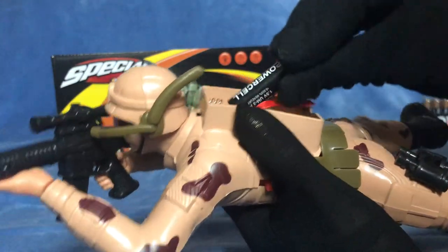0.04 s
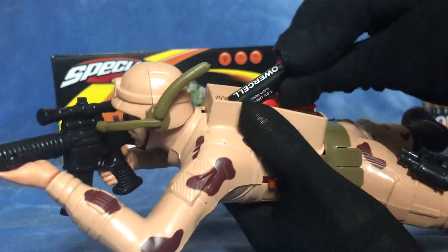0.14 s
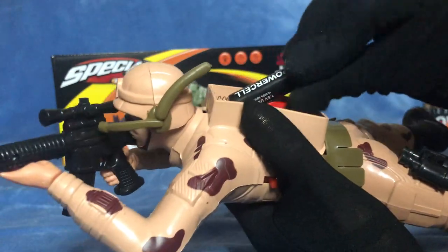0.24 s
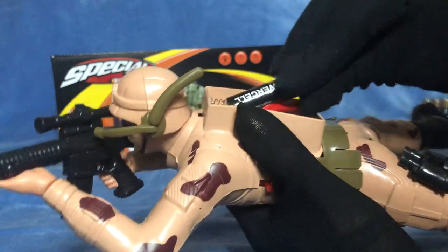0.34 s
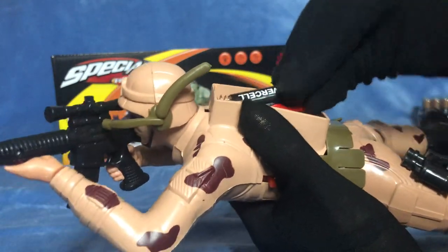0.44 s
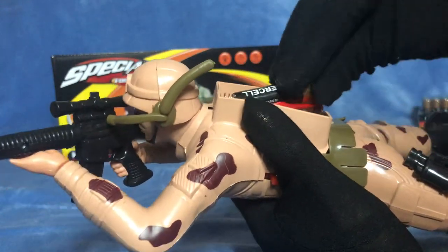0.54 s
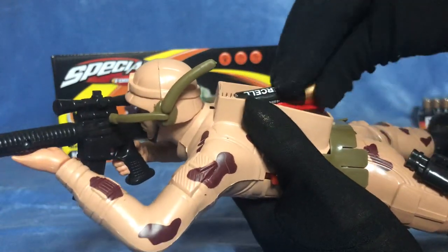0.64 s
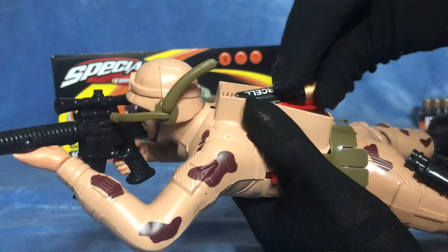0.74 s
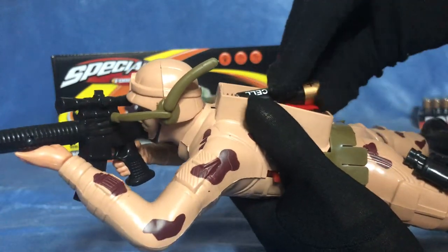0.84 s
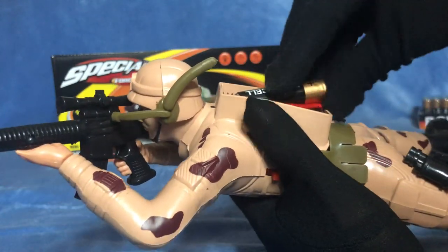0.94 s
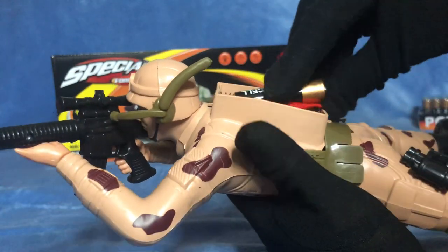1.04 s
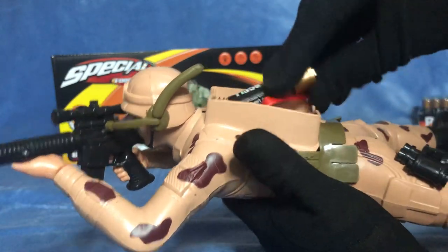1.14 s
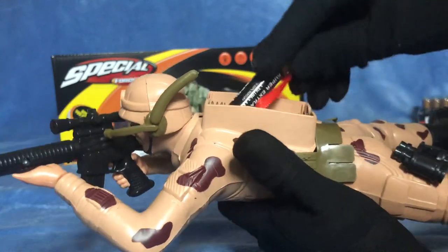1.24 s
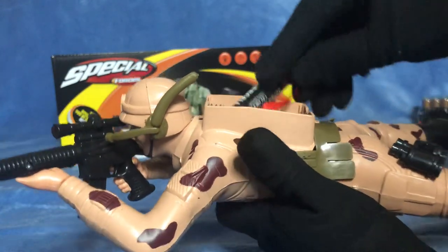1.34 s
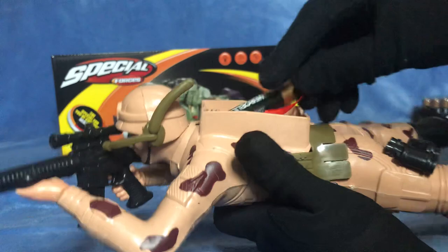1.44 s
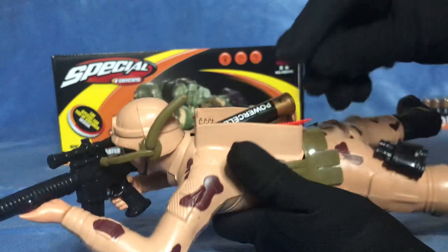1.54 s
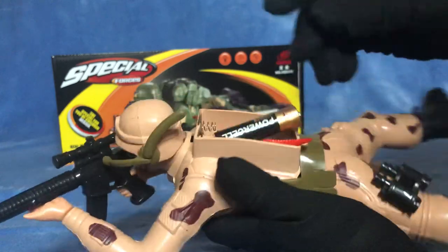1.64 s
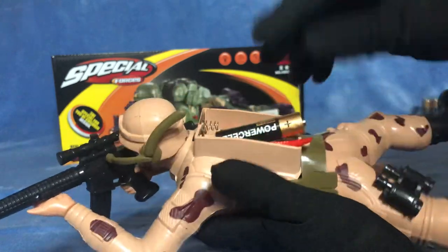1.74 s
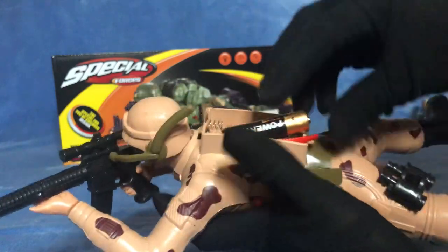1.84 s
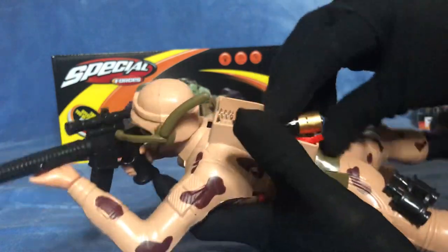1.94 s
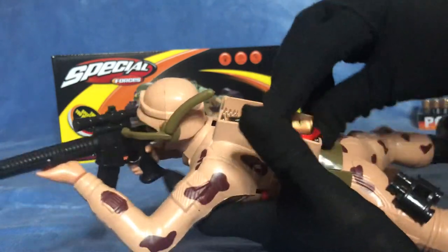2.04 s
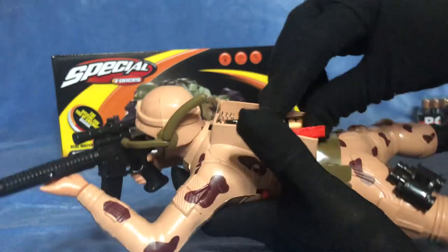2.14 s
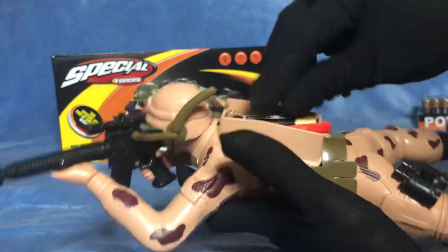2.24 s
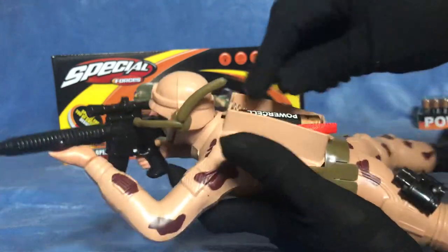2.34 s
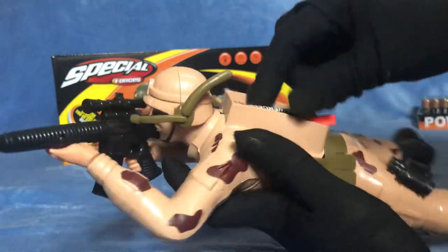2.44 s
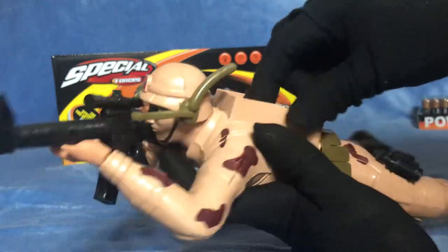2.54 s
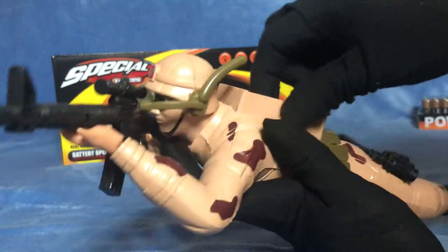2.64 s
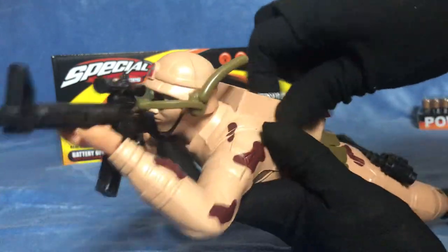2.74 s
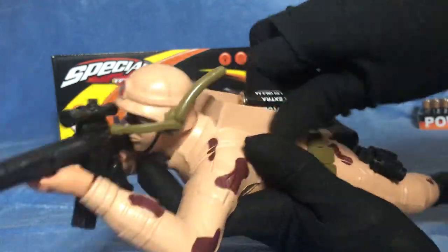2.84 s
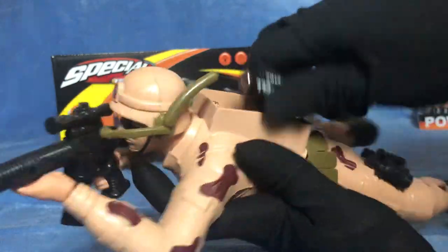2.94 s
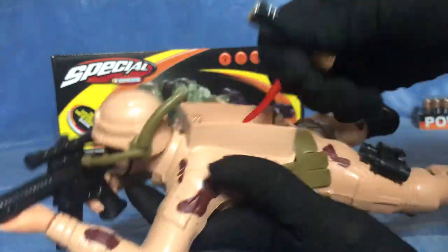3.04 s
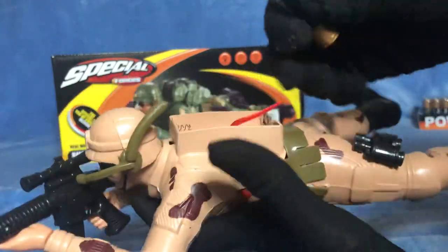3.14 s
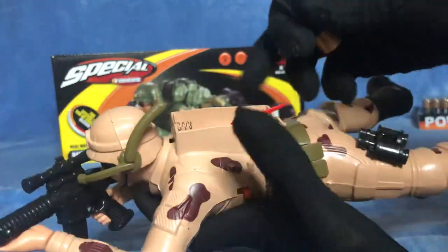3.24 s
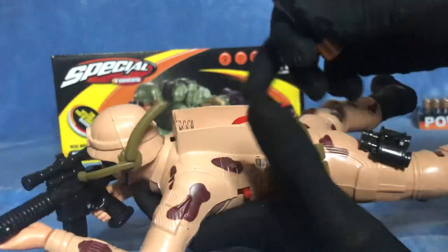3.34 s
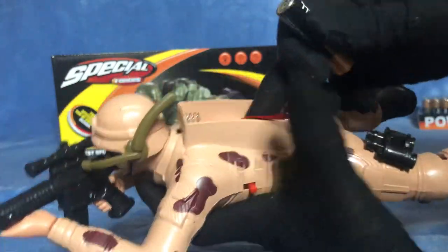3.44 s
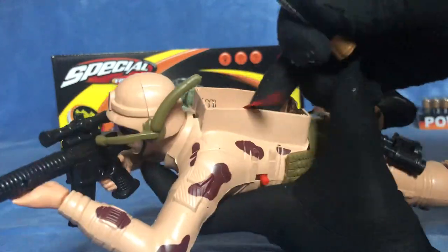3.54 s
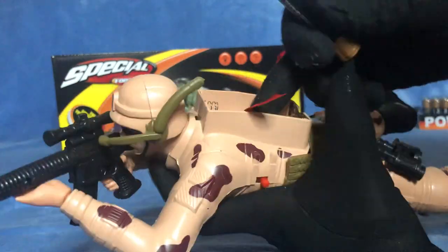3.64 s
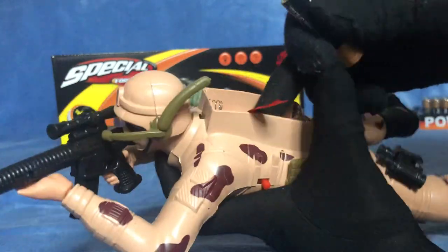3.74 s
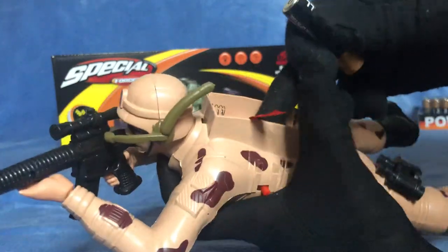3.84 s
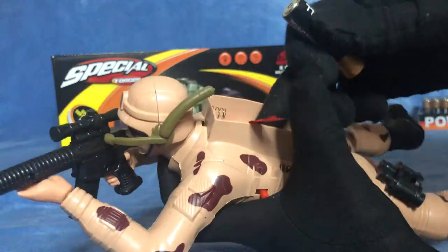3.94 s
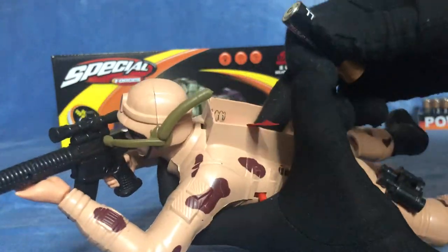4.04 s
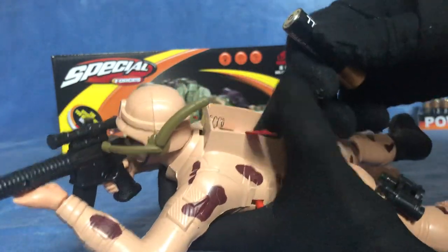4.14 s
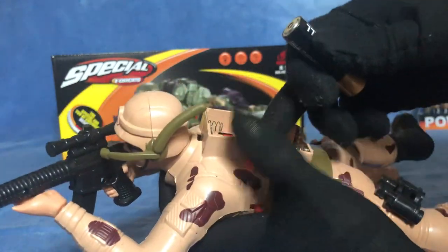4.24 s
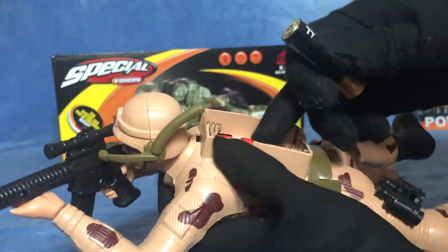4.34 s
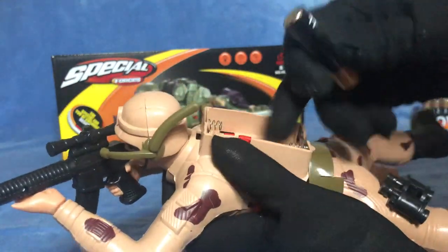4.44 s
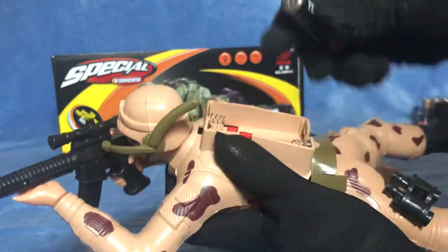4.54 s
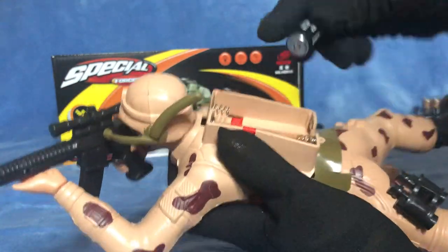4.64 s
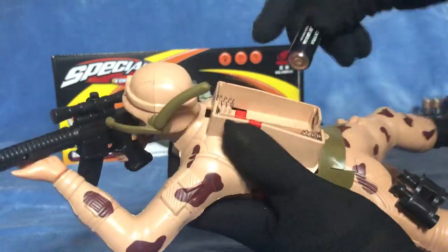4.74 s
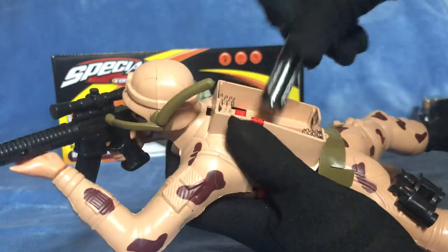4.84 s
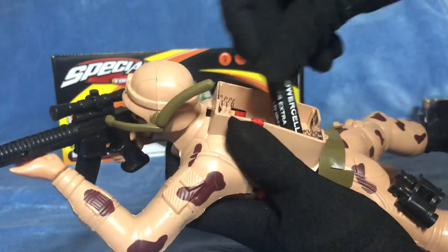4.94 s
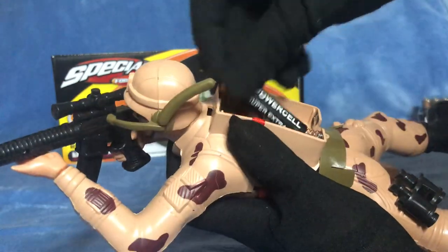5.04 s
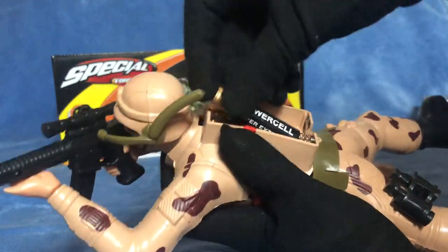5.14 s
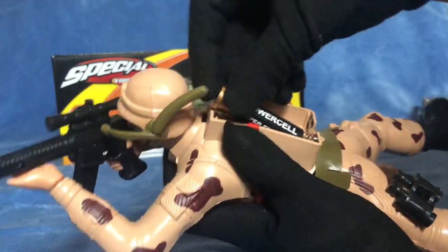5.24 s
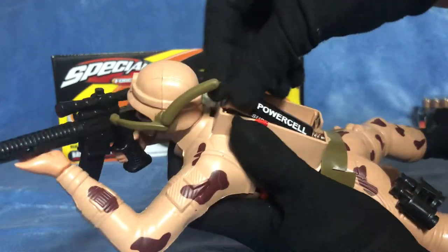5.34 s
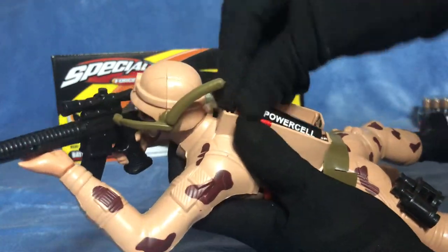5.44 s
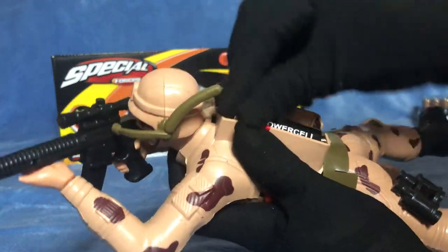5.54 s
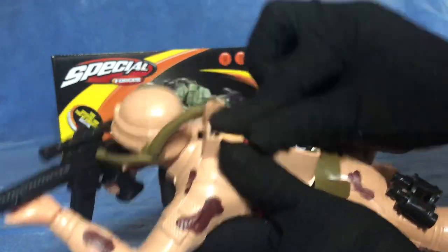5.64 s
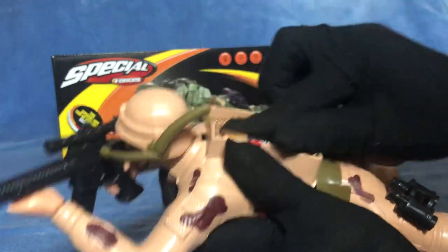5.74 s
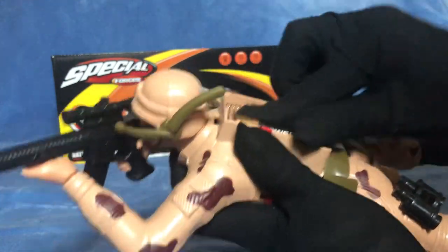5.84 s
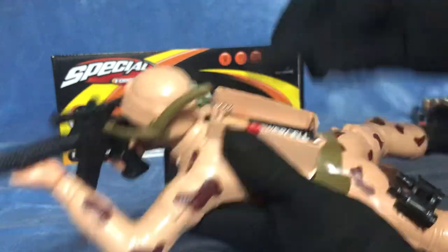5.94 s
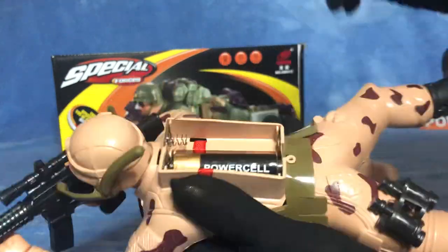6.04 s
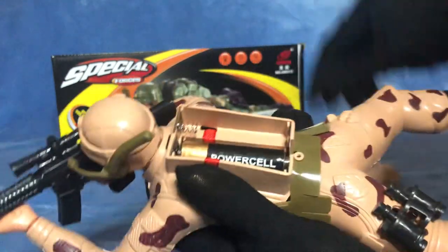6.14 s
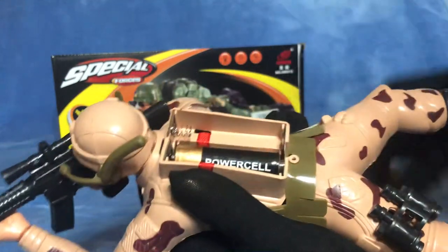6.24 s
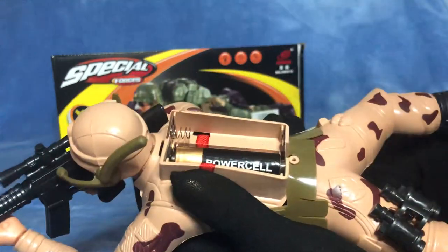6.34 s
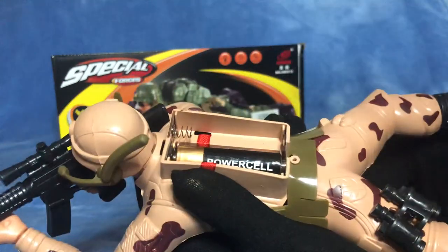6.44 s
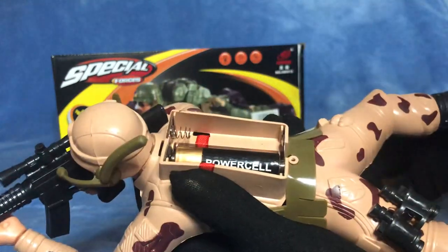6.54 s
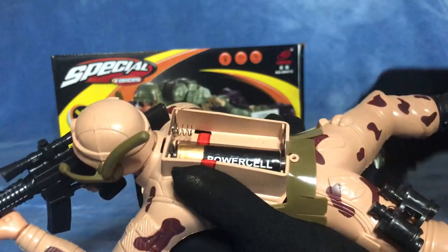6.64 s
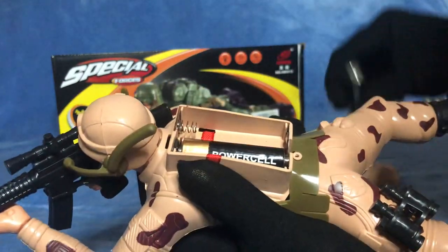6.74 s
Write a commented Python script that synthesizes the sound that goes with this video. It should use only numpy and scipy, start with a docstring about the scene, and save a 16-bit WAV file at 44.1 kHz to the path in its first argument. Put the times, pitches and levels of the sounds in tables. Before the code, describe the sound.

Gloved hands press batteries into a hollow plastic toy, close to the microphone in a small room. Sharp clicks and knocks come unevenly with soft cloth rubbing, and a loose battery drops and rattles a few times. One hard snap makes the toy thump. After a quieter spell, a dull handling rumble and another run of clicks and scrapes follow. A fan hums and ticks faintly throughout.

```python
"""Gloved hands press batteries into a hollow plastic toy, close by in a small room.
From the start a fan hums and ticks faintly, while cloth rubs and batteries click on shell and springs.
Between 1.3 and 2.1 s a loose battery drops and bounces three times. Near 2.7 s the hardest snap
makes the whole toy thump. After a quieter spell, handling rumbles from about 4.5 s and a last run
of clicks and scrapes follows. From 6.1 s the rumble fades, leaving the fan and faint brushing."""
import sys
import numpy as np
from scipy import signal
from scipy.fft import rfft, irfft, next_fast_len
from scipy.io import wavfile
from scipy.ndimage import uniform_filter1d

SR = 44100
rng = np.random.default_rng(int(sys.argv[2]) if len(sys.argv) > 2 else 0)


def materialize(psi):
    """Save the field psi as 16-bit PCM at rate SR to the path in sys.argv[1].

    A 1-D psi becomes a single channel; in a 2-D psi each row is a channel.
    """
    bounded = np.clip(np.atleast_2d(psi).T, -1, 1)
    quanta = np.round(bounded * 32767).astype(np.int16)
    wavfile.write(sys.argv[1], SR, quanta)


N = 300317
TIME = np.arange(N) / SR

# A battery hits the shell: start_s, level_db, pitch_hz, ring_db, hollow_db, bright_db, chatter_s
BATTERY_CLICKS = [(0.0667, -49.5, 3800, 16, -18, -12, .0003), (0.3741, -43, 3680, 3, -12, -24, .0003),
                  (0.3887, -46, 4500, 4, -10, -5, 0.004), (0.3925, -38, 3560, 4, -12, 3.5, 0.0011),
                  (0.6778, -48.5, 2030, 14, 6, -22, 0.00066), (1.4317, -49, 3840, 5, 2, -16, 0.0014),
                  (1.4595, -38, 1550, 12, -4, -10, 0.00094), (1.8214, -50, 1480, 11, 5, -24, 0.001),
                  (1.9609, -39.5, 2480, 0.5, -2.5, -14, 0.00087),
                  (2.0318, -32.5, 4000, 13.5, -8, 4, 0.0014), (2.2878, -58.5, 5220, 11, 3, 8, .0005),
                  (2.3596, -40.5, 2690, 5.5, 1, -9, 0.0005), (2.481, -46, 2010, 6, 3, -10, .0034),
                  (2.4926, -48.5, 3730, 10, 11, -5, 0.00074), (2.5125, -50.5, 1110, 8, 5, -5, .0008),
                  (2.7389, -39, 4500, 8, -13, 0, .003), (2.7453, -21, 3920, 5, -30, -12.5, .0001),
                  (2.7521, -35, 4400, 10, -17, 0, .0003), (2.7868, -48, 2120, 8, 11, -5, .0021),
                  (2.8284, -56, 3710, 10, -3, -12, .0005), (2.8696, -39.5, 2460, 8.5, -10, -7.5, 0.0014),
                  (2.9262, -45.5, 4960, 1, -7, -3, .0036), (2.9972, -50, 2060, 18, -5, -6, .0034),
                  (3.8572, -51.5, 2030, 14, 13, -8, 0.0014), (4.425, -51.5, 5090, 8, -3, -8, .0005),
                  (4.9344, -48.5, 3530, 11, -9, -5, 0.0013), (4.9673, -39, 4540, 11, -13.5, -9, .0004),
                  (5.093, -37.5, 3900, 15, 10, -7, 0.0011), (5.3891, -35, 9300, 15.5, 6, -7, 0.0012),
                  (5.4516, -40, 3900, 23, -4, -8, 0.00029), (5.4545, -35.5, 8760, 11, 2, 0.5, 0.0004),
                  (5.5072, -35, 9210, 13, 8, 3.5, 0.00063), (5.6058, -47, 1910, 21, 4, 3, 0.0025),
                  (5.6877, -44.5, 3830, 12, -17, -3, .0003), (5.7018, -31, 5360, 15.5, -4.5, 14, 0.0015),
                  (5.9231, -46.5, 1900, 16, -4, -2, 0.0034), (6.042, -49.5, 1110, -5, 14.5, -5, 0.0016),
                  (6.067, -51, 2040, 12, 11, -6, .0016), (6.1019, -47, 1950, 22, 8, 0, 0.00092)]
# A loose battery lands: start_s, level_db, pitch_hz, hollow_db, bright_db, first_flight_s
BATTERY_DROPS = [(1.3615, -39, 3900, -9.5, -12.5, 0.023), (1.7135, -38, 3500, -5, -12.5, 0.011),
                 (2.049, -36, 1460, 7.5, -13, .0234)]
# Notes the plastic shell rings at: pitch_hz, gain_db, fade_s (time to fall by 60 dB)
SHELL_NOTES = [(714, -6, 0.0065), (980, -10, 0.046), (1365, -3.5, 0.016), (1990, -7.5, 0.025),
               (2630, -19.5, 0.057), (3560, -10, 0.022), (4125, -7, 0.015), (4970, -6, 0.011),
               (6960, -5.5, 0.029)]
# Notes of the toy's hollow body: pitch_hz, level_db, fade_s
BODY_NOTES = [(170, -48, .06), (255, -41, 0.031), (314, -39.5, 0.062), (1977, -28, 0.029)]
# Strokes of glove and battery: start_s, length_s, level_db, scrape_db (compared with the cloth)
RUB_STROKES = [(0.264, .12, -63.5, -0.5), (0.974, 0.072, -69.5, -9), (1.1, 0.14, -71.5, 5),
               (1.412, 0.27, -62.5, -1.5), (2.033, .06, -65, 8), (2.17, 0.033, -61.5, 5),
               (2.353, .2, -65.5, 4.5), (2.748, .11, -70, 9.5), (2.931, .11, -63.5, -2),
               (3.348, .25, -76, 1), (3.797, 0.029, -64, -3), (4.407, 0.062, -65.5, 4),
               (4.56, 0.29, -75.5, -23), (4.952, 0.0097, -55.5, 4), (5.056, 0.021, -69, 16.5),
               (5.185, 0.0076, -60.5, -6), (5.592, 0.031, -57.5, 3), (5.623, .043, -53, 1.5),
               (5.656, 0.067, -59, -8), (5.868, 0.062, -49, -9)]
# Tone of rubbing cloth: pitch_hz, gain_db
CLOTH_TONE = [(1500, -33), (3000, 5.5), (5000, 7), (7500, 4.5), (10500, 5.5), (15000, 0)]
# Tone of scraping on the shell: pitch_hz, gain_db
SCRAPE_TONE = [(500, 4), (1200, -1), (2000, 4.5), (2700, -5.5), (4000, 5.5), (6500, -11), (12000, -27)]
# Dull rumble as the toy is held and turned: time_s, level_db
RUMBLE_LEVELS = [(0, -79), (4.3, -69), (4.8, -54), (5.3, -53), (5.7, -60), (6.1, -58), (6.5, -74)]
# Notes in the fan's hum: multiple_of_motor_speed, level_db
HUM_NOTES = [(2, -60.5), (3, -59), (7, -69.5), (11, -76.5), (18, -79), (20, -75), (26, -79), (27, -84.5),
             (28, -89), (30, -80), (32, -82), (34, -86)]
# Tone of the fan's tick: pitch_hz, gain_db
TICK_TONE = [(1500, -2.5), (2800, -3), (3800, 9), (5000, -2), (7000, -6.5), (9000, -6), (10500, -19),
             (14000, -8), (16000, -23)]
# Tone of the moving air: pitch_hz, gain_db
AIR_TONE = [(20, -14), (33, -5), (45, -4), (80, 1.5), (115, -7), (210, -4.5), (300, -7.5), (450, -15),
            (700, -19.5), (950, -15.5), (1600, -24), (2600, -28.5), (4200, -32), (7000, -41.5),
            (15500, -45)]
# Pitches the room rings at: pitch_hz, width_hz, level_db
ROOM_NOTES = [(95.9, 9.7, -62.5), (1814, 300, -73.5)]


def clicks():
    """Batteries are pressed against the shell and snap past the springs."""
    out = np.zeros(N)
    for start_s, *settings in BATTERY_CLICKS:
        add(out, start_s, contact(*settings))
    return out


def contact(level_db, pitch_hz, ring_db, hollow_db, bright_db, chatter_s):
    """One sharp push, then tiny slips that die away; a hollow spot adds knock, a hard edge adds treble."""
    t = np.arange(4096) / SR
    skid = np.clip(chatter_s / 0.0016, 0, 1) ** 1.64  # near 0 for a clean snap, 1 for a full skid
    push = gain(-7) * skid * rng.standard_normal(len(t)) * np.exp(-t / max(chatter_s, 1 / SR))
    push[0] += 1
    knock = [(100, hollow_db - 22), (300, hollow_db - 9), (700, hollow_db + 1),
             (1750, 0.44 * hollow_db - 2.5)]
    snap = [(3150, 2), (4000, 0), (4900, -1)]
    top_db = bright_db + 3.5 + 0.33 * level_db  # a harder push is shorter and so brighter
    edge = [(6400, 0.7 * bright_db - 2), (9000, bright_db - 6), (11000, top_db), (16000, top_db - 3)]
    click = signal.fftconvolve(push, shell(t))[:len(t)]
    click = shape_tone(click, knock + snap + edge)
    click = bending_waves(ring(click, pitch_hz, ring_db))
    # set the level as if the click's energy were spread over 6 ms
    return click * gain(level_db) * np.sqrt(0.006 * SR / np.sum(click ** 2))


def shell(t, notes_db=-29, wash_db=-30.5, rim_echo=0.47):
    """Struck plastic gives a crack, an echo off the rim, a few clear notes and a wash of tiny ones."""
    hz, db, fade_s = np.transpose(SHELL_NOTES)[:, :, None]
    spot = rng.standard_normal((len(SHELL_NOTES), 2))
    strength = gain(db + 2 * spot[:, :1])  # each spot favours other notes
    pitch_hz = hz * (1 + 0.013 * spot[:, 1:])  # the grip shifts their tuning
    notes = strength * fade(t, fade_s) * np.cos(2 * np.pi * pitch_hz * t)
    wash = rng.standard_normal(len(t)) * fade(t, 0.025)
    out = gain(notes_db) * notes.sum(0) + gain(wash_db) * wash
    out[0] += 1  # the crack
    out[rng.integers(20, 42)] += rim_echo
    return out


def bending_waves(x, travel_s=0.001009):
    """Low notes travel more slowly through the plastic and arrive later."""
    hz = np.arange(len(x) + 1) * SR / (2 * len(x))
    slowness = np.sqrt(4000 / (hz + 200))
    delay_s = travel_s * (slowness - slowness[-1])
    phase = 2 * np.pi * np.cumsum(delay_s) * hz[1]
    return irfft(rfft(x, 2 * len(x)) * np.exp(-1j * phase))[:len(x)]


def drops(hits=5, flight_share=0.64, softer_db=6.5, hollower_db=3.5):
    """A dropped battery bounces ever faster, softer and more hollow until it lies still."""
    out = np.zeros(N)
    for hit_s, db, hz, hollow_db, bright_db, first_flight_s in BATTERY_DROPS:
        for k in range(hits):
            hit = contact(db - k * softer_db, hz, ring_db=2.5, hollow_db=hollow_db + k * hollower_db,
                          bright_db=bright_db, chatter_s=0.00075)
            add(out, hit_s, hit)
            hit_s += first_flight_s * flight_share ** k
    return out


def thump(start_s=2.748):
    """The hardest snap shakes the toy's whole hollow body."""
    out, t = np.zeros(N), np.arange(SR // 2) / SR
    for hz, db, fade_s in BODY_NOTES:
        add(out, start_s, gain(db) * fade(t, fade_s) * np.sin(2 * np.pi * hz * t))
    return out


def rubs(brush_db=-80.5, squeak_hz=5200, squeak_db=6):
    """Cloth and battery catch and slip many times in each stroke; some of it sounds through the shell."""
    sizes = np.minimum(rng.exponential(size=N), 4)
    catches = rng.standard_normal(N) * gain(5 * sizes + 4.3 * drift(170))
    cloth = normalise(ring(shape_tone(catches, CLOTH_TONE), squeak_hz, squeak_db))
    scrape = normalise(shape_tone(catches[::-1], SCRAPE_TONE))
    out = gain(brush_db + 4 * drift(22)) * (cloth + scrape)  # the gloves brush lightly all along
    for start_s, length_s, db, scrape_db in RUB_STROKES:
        t = np.arange(int(length_s * SR)) / SR
        swell = np.abs(np.sin(np.pi * t / length_s)) ** 0.52  # an arch with a quick start and a flat top
        part = slice(int(start_s * SR), int(start_s * SR) + len(t))
        add(out, start_s, gain(db) * swell * (cloth[part] + gain(scrape_db) * scrape[part]))
    return out


def handling_rumble():
    """Holding and turning the toy makes a dull rumble that swells and fades."""
    level_db = np.interp(TIME, *np.transpose(RUMBLE_LEVELS))
    return gain(level_db) * noise_band(80.4, width_hz=17)


def fan(motor_hz=46.04, ticks_per_s=17.464, first_tick_s=0.0315, tick_db=-61):
    """The motor hums and wavers, and the fan ticks lightly at a steady rate of its own, about 17.5 times a
    second."""
    angle = 2 * np.pi * np.cumsum(motor_hz * (1 + 0.00101 * drift(3))) / SR
    hum = np.zeros(N)
    for multiple, db in HUM_NOTES:
        strength = np.sqrt(2) * gain(db + 1.54 * drift(4.5))
        hum += strength * np.sin(multiple * angle + rng.uniform(0, 2 * np.pi))
    since_tick_s = (TIME - first_tick_s) % (1 / ticks_per_s)
    rise = 1 - np.exp(-since_tick_s / 0.0013)
    fall = 1.43 * fade(since_tick_s, 0.018) + gain(-6) * fade(since_tick_s, 0.097)  # tick, then its echo
    # the same rough patch comes round with every tick
    grit = rng.standard_normal(N) + 0.9 * rng.standard_normal(SR)[(since_tick_s * SR).astype(int)]
    ticks = rise * fall * normalise(shape_tone(grit, TICK_TONE))
    return hum + gain(tick_db + 2 * drift(22)) * ticks


def air(level_db=-53):
    """Moving air makes a steady rush, and the room rings softly with it."""
    rush = gain(level_db + 0.8 * drift(4.9)) * normalise(shape_tone(rng.standard_normal(N), AIR_TONE))
    return rush + sum(gain(db) * noise_band(hz, width_hz) for hz, width_hz, db in ROOM_NOTES)


def room(x):
    """Quick echoes come off nearby surfaces, then a soft tail off the walls, which swallow the treble."""
    t, out = np.arange(SR // 2) / SR, x
    for echo_db, fade_s, treble_db in ((-20, 0.03, -3), (-28, 0.22, -9)):  # nearby surfaces, walls
        tone = [(200, 3), (2000, 1), (4000, -2), (8000, treble_db), (15000, treble_db - 4)]
        tail = shape_tone(rng.standard_normal(len(t)) * fade(t, fade_s) * (t > 0.004), tone)
        tail /= np.sqrt(np.sum(tail ** 2))
        out = out + gain(echo_db) * signal.fftconvolve(x, tail)[:N]
    return out


def gain(db):
    """Turn decibels into a number to multiply by."""
    return 10 ** (np.asarray(db) / 20)


def normalise(x):
    """Scale a sound so its average level (rms) is 1."""
    return x / np.sqrt(np.mean(x ** 2))


def add(out, start_s, x):
    """Mix x into out, beginning at start_s."""
    i = max(int(start_s * SR), 0)
    out[i:i + len(x)] += x[:max(N - i, 0)]


def fade(t, fade_s):
    """Die away smoothly, falling by 60 dB in fade_s."""
    return np.exp(-np.log(1000) * t / fade_s)


def drift(changes_per_s):
    """Wander at random around 0, typically by about 1."""
    step = max(int(SR / changes_per_s), 2)
    stairs = np.repeat(rng.standard_normal(N // step + 1), step)
    return normalise(uniform_filter1d(stairs, step)[:N])


def noise_band(pitch_hz, width_hz):
    """Noise gathered around one pitch, at an average level of 1."""
    hz = np.arange(N // 2 + 1) * SR / N
    spectrum = rfft(rng.standard_normal(N)) / (1 + (2 * (hz - pitch_hz) / width_hz) ** 2)
    return normalise(irfft(spectrum, N))


def ring(x, pitch_hz, boost_db):
    """Boost a narrow band around one pitch; higher bands are a little wider."""
    width_hz = 350 + 0.049 * pitch_hz
    band = signal.lfilter(*signal.iirpeak(pitch_hz, pitch_hz / width_hz, fs=SR), x)
    return x + (gain(boost_db) - 1) * band


def shape_tone(x, points):
    """Turn pitches up or down along a curve of (pitch_hz, gain_db) points."""
    size = 2 * next_fast_len(len(x))
    hz, db = np.transpose(points)
    all_hz = np.arange(size // 2 + 1) * SR / size
    curve_db = np.interp(np.log(all_hz + 1), np.log(hz), db)
    # folding the cepstrum (the log curve turned into time) makes the filter ring only after a hit
    cepstrum = irfft(np.log(gain(curve_db)))
    cepstrum[1:size // 2] *= 2
    cepstrum[size // 2 + 1:] = 0
    return irfft(rfft(x, size) * np.exp(rfft(cepstrum)))[:len(x)]


def scene():
    """The toy close by and the fan behind it, in one channel."""
    knocks = room(clicks() + drops() + thump())
    return (knocks + rubs() + fan() + air() + handling_rumble())[None]


def record(dry, lowest_hz=26, highest_hz=15850):
    """Cut away the deepest bass and the highest treble."""
    dry = signal.sosfilt(signal.butter(4, lowest_hz, "high", fs=SR, output="sos"), dry)
    return signal.sosfilt(signal.ellip(8, 0.2, 70, highest_hz, fs=SR, output="sos"), dry)


dry = scene()
out = record(dry)
materialize(out)
```